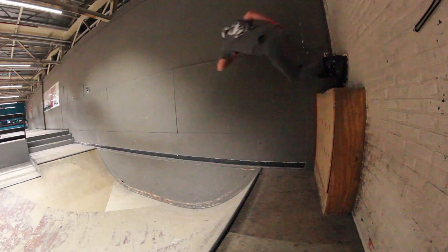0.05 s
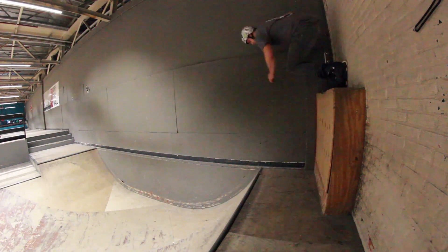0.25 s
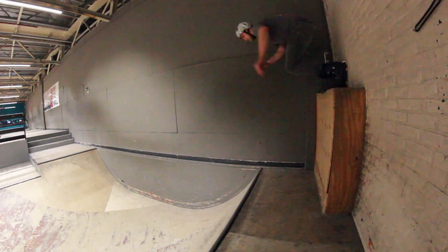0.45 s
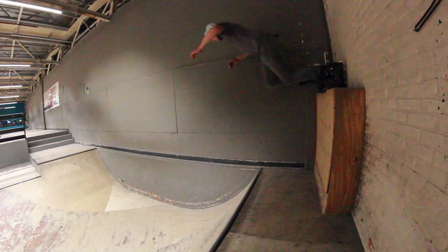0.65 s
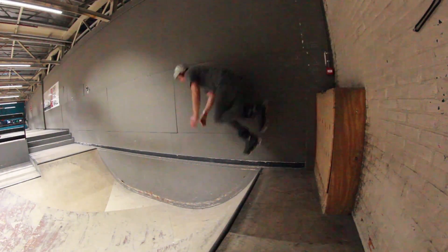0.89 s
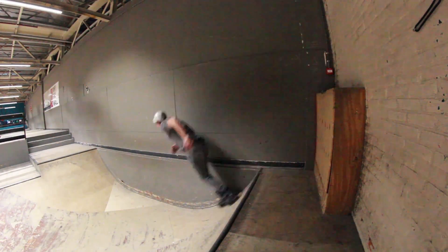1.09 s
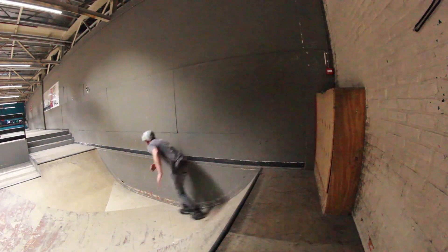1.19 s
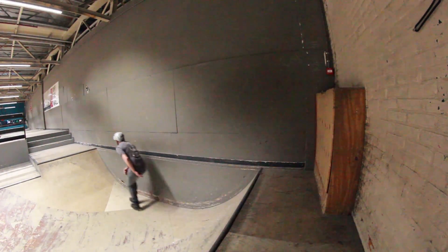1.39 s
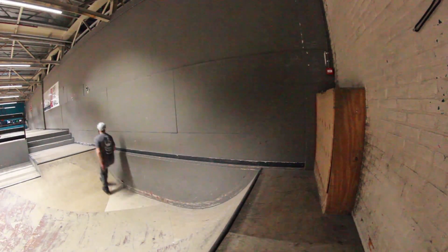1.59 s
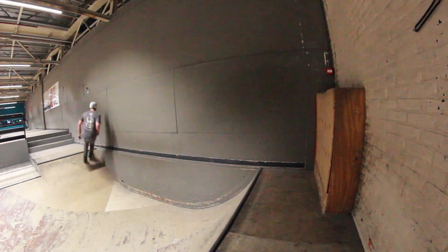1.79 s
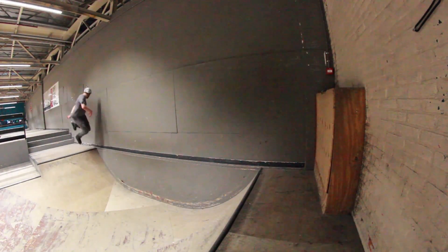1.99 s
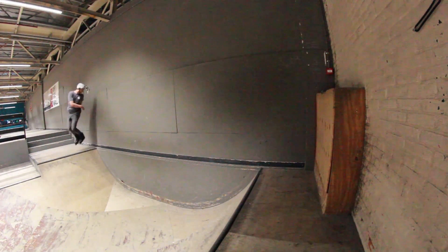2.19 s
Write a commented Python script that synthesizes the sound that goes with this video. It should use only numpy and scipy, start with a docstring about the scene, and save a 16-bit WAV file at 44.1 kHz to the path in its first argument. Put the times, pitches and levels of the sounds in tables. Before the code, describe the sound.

Hard skate knocks on hollow wood, a ramp landing and fading wheel rumble, echoing indoors.

```python
"""Hard wooden thuds and plastic clacks ring out in a large hall, then a rumble rolls away.
An inline skater jumps onto a hollow ledge, stalls, and drops back onto a plywood ramp. Wheels and boots
set the wood ringing and the frames clack; the rolling wheels crunch over grit and knock on panel seams.
The hall rings on behind every blow, and the loudest ones overload the microphone."""
import sys
import numpy as np
from scipy import signal
from scipy.fft import rfft, irfft
from scipy.io import wavfile

SR = 44100
rng = np.random.default_rng(int(sys.argv[2]) if len(sys.argv) > 2 else 0)


def master_out(mix):
    """Clip the mix to full scale and print it as 16-bit PCM to the path in sys.argv[1]."""
    frames = np.transpose(np.atleast_2d(mix))
    ceiling = np.clip(frames, -1, 1)
    pcm = np.round(ceiling * 32767).astype(np.int16)
    wavfile.write(sys.argv[1], SR, pcm)


N = 99225
T = np.arange(N) / SR
HIT_T = T[:SR // 5]  # time axis of one hit
STRIKE_RISE_S = 0.0012

# fader moves of the wheels on wood: t/s, rumble level/dB, gritty roar level/dB
ROLL = [(0, -34, -39), (.1, -43, -43), (.16, -20.5, -20.5), (.24, -25.5, -42), (.33, -26, -57),
        (.5, -33.5, -42.5), (.64, -43.5, -43), (.71, -36.5, -46), (.82, -38, -47), (1.14, -41.5, -55),
        (1.18, -13, -23.5), (1.29, -25.5, -33), (1.4, -25, -28.5), (1.55, -34, -36.5), (1.8, -31.5, -34.5),
        (1.92, -35, -41.5), (2.05, -38.5, -47.5), (2.25, -44, -52.5)]


def amp(db):
    """Decibels to gain."""
    return 10 ** (np.asarray(db) / 20)


def unit(x):
    """Scales to rms 1."""
    return x / np.sqrt(np.mean(x ** 2) + 1e-20)


def read(points, hz):
    """Reads a table on a log-frequency axis."""
    f, value = np.transpose(points)
    return np.interp(np.log(hz + 1), np.log(f + 1), value)


def curve(table, column):
    """One column of a time table at every sample."""
    rows = np.array(table)
    return np.interp(T, rows[:, 0], rows[:, column])


def colour(x, eq):
    """Filters x through an EQ curve."""
    return irfft(rfft(x) * amp(read(eq, np.fft.rfftfreq(len(x), 1 / SR))), len(x))


def noise(eq):
    """Steady coloured noise, rms 1."""
    return unit(colour(rng.standard_normal(N), eq))


def add(mix, s, sound):
    """Mixes a sound in at time s."""
    part = mix[max(round(s * SR), 0):][:len(sound)]
    part += sound[:len(part)]


def wander(hz):
    """Smooth random modulation, rms 1."""
    rolloff = 1 + (np.fft.rfftfreq(N, 1 / SR) / hz) ** 4
    return unit(irfft(rfft(rng.standard_normal(N)) / rolloff, N))


def strike(t, t60, rise=STRIKE_RISE_S):
    """Quick attack, exponential decay."""
    return (1 - np.exp(-t / rise)) * amp(-60 * t / t60)


def ringing(modes, hz, rise, length=1):
    """Struck modes swell as the wheel presses in, then die away; neighbours swing in opposite phase."""
    ring = sum((-1) ** i * amp(db - 60 * HIT_T / (t60 * length)) * np.sin(2 * np.pi * hz * ratio * HIT_T)
               for i, (ratio, db, t60) in enumerate(modes))
    return ring * (1 - np.exp(-HIT_T / rise)) ** 2


def room_tone():
    """A faint, steady bed of air."""
    air_eq = [(20, -24), (100, -25), (300, 1.5), (1000, -10.5), (3000, -14), (7000, -25.5), (16000, -29)]  # f/Hz, level/dB
    return amp(-53.5) * noise(air_eq)


def hall(x):
    """Scatter off the surrounding ramps, then the long tail of the hall."""
    decay = [(60, 1.2), (250, 0.86), (500, 2.4), (1200, 1.15), (2500, 1.42), (5000, 1.0), (8000, 0.67),
             (11000, -0.1), (15000, -0.5)]  # ring time, floored below: f/Hz, t60/s
    tail_eq = [(60, -4.5), (250, -8.5), (380, -10.5), (550, -8), (1200, -5.5), (2500, -4.5), (5000, -3.5),
               (8000, -6), (14000, -5)]  # f/Hz, level/dB
    hz, t, bands = signal.stft(rng.standard_normal(N), SR, nperseg=512)
    t60 = np.maximum(read(decay, hz), 0.05)[:, None]
    equal_energy = np.sqrt(2 * np.log(1000) / (t60 * SR))
    bands = bands * amp(read(tail_eq, hz)[:, None] - 60 * t / t60) * equal_energy
    tail = signal.istft(bands, SR, nperseg=512)[1][:N]
    tail *= 1 - np.exp(-T / 0.015)  # the tail blooms
    taps = rng.standard_normal(N) * (rng.random(N) < 1500 / SR) * strike(T, t60=0.16, rise=0.012)
    scatter = amp(-12) * taps / np.linalg.norm(taps)
    return signal.fftconvolve(x, scatter + tail)[:N]


def reflected(x):
    """The direct sound with its early reflections off wall and ramp."""
    echoes = [(.0052, -17), (0.0103, -12.5), (0.022, -15.5)]  # delay/s, level/dB
    out = x.copy()
    for delay, db in echoes:
        add(out, delay, amp(db) * x)
    return out


def boom():
    """A narrow resonance of the hollow woodwork that shifts as the skater moves over it."""
    glide = [(0, 256, -42), (.22, 270.5, -58), (.3, 276.6, -20), (.45, 262, -28), (.6, 249.4, -33),
             (.7, 242.6, -39.5), (.87, 280, -38.5), (1.13, 255, -46), (1.2, 330.7, -26),
             (1.28, 330.3, -22.5), (1.42, 310.7, -42), (1.52, 318, -29.5), (1.62, 290, -30),
             (1.72, 252, -30.5), (1.79, 232.2, -28.5), (1.85, 215, -70), (2.25, 270, -47)]  # panel resonance: t/s, f/Hz, level/dB
    width_hz = 60
    shake = wander(width_hz / 2) + 1j * wander(width_hz / 2)
    shake /= np.sqrt(abs(shake) + 0.3)  # evens out the swells
    carrier = np.exp(2j * np.pi * np.cumsum(curve(glide, column=1)) / SR)
    return amp(curve(glide, column=2)) * unit((shake * carrier).real)


def specks():
    """Tiny snaps of dirt crushed by the wheels, riding below the roar."""
    speck_eq = [(1000, -20), (4000, 0), (8000, 0), (13000, -5), (16000, 1)]  # f/Hz, level/dB
    per_s, under_roar_db = 210, 23
    hits = (rng.random(N) < per_s / SR) * rng.random(N) ** 2
    snaps = signal.fftconvolve(hits, strike(T[:SR // 20], t60=0.022, rise=0.00018))[:N]
    return amp(curve(ROLL, column=2) - under_roar_db) * unit(snaps * noise(speck_eq))


def rolling():
    """Wheels shake the ramp and crunch over fine grit under a fluttering load."""
    rumble_eq = [(20, -53), (45, -24.5), (100, -6.5), (180, -0.5), (300, 2), (450, -5), (700, -10.5),
                 (1500, -16), (4000, -47)]  # f/Hz, level/dB
    roar_eq = [(100, -4.5), (400, 0.5), (800, 1.5), (1500, -8), (2500, -10.5), (4000, -17.5), (7000, -30.5),
               (11000, -35), (16000, -42.5)]  # f/Hz, level/dB
    grains_per_s, spread_db, flutter_db = 6000, 2.0, 1.5
    grit = rng.standard_normal(N) * (rng.random(N) < grains_per_s / SR)
    grit *= amp(spread_db * np.minimum(rng.exponential(1, N), 3))
    load = unit(amp(flutter_db * wander(hz=33)))
    rumble = amp(curve(ROLL, column=1)) * noise(rumble_eq)
    roar = amp(curve(ROLL, column=2)) * unit(colour(grit, roar_eq))
    return load * (rumble + roar)


def slides():
    """Brief swells of friction: a wheel scuffs sideways, a boot rubs along the ledge."""
    scuffs = [(1.951, .016, -35.5)]  # t/s, length/s, level/dB
    scuff_eq = [(300, -14), (1300, 7.5), (2500, -1.5), (5000, -3.5), (10000, -9.5), (16000, -15)]  # f/Hz, level/dB
    rubs = [(.668, 0.068, -34)]  # t/s, length/s, level/dB
    rub_eq = [(100, -31), (380, 0), (600, 9), (780, -11), (1100, -15), (3000, -26), (16000, -49)]  # f/Hz, level/dB
    friction = np.zeros(N)
    for cues, eq in (scuffs, scuff_eq), (rubs, rub_eq):
        swell = np.zeros(N)
        for s, length, db in cues:
            add(swell, s, amp(db) * np.sqrt(np.hanning(int(length * SR))))
        friction += swell * noise(eq)
    return friction


def seams():
    """Wheels knock and click over panel seams. Gives the ring and the click's (envelope, EQ)."""
    cues = [(1.3703, -4.5, -23, 500), (1.401, -19, -33, 702), (1.645, -17, -39, 1023),
            (1.678, -18.5, -29, 916), (1.7486, -22, -20, 960), (1.788, -35, -23, 1273)]  # t/s, knock level/dB, click level/dB, knock f/Hz
    wheel_modes = [(.78, -6, 0.013), (1.03, 3, 0.014), (1.6, -4, 0.026), (1.76, -8.5, 0.023),
                   (2.65, -5, 0.011), (3.15, -15.5, .025), (5.4, -20, 0.028)]  # pitch ratio, level/dB, t60/s
    click_eq = [(400, 7.5), (1500, 8), (2500, 4), (4000, -6.5), (7500, -12.5), (10000, -19), (16000, -40)]  # f/Hz, level/dB
    ring, click = np.zeros((2, N))
    for s, knock_db, click_db, hz in cues:
        add(ring, s, amp(knock_db) * ringing(wheel_modes, hz, rise=0.00082))
        add(click, s, amp(click_db) * strike(HIT_T, t60=0.034))
    return ring, (click, click_eq)


def cracks():
    """The hard, bright snap of a frame against an edge, as (envelope, EQ)."""
    cues = [(0.1512, -3.5), (0.2588, -19.5), (1.1637, -34), (1.748, -28)]  # t/s, level/dB
    crack_eq = [(200, -12), (800, 7), (1400, 3.5), (2000, 0), (2900, -11), (3600, 1), (4500, 3), (5300, 1),
                (6000, 4.5), (6700, 2.5), (7500, -3.5), (11000, -14), (16000, -11)]  # f/Hz, level/dB
    snap = np.zeros(N)
    for s, db in cues:
        add(snap, s, amp(db) * strike(HIT_T, t60=0.013))
    return snap, crack_eq


def blows():
    """Skates slam the plywood and rattle. Gives the thud, then clack and tick as (envelope, EQ)."""
    # t/s, thud level/dB, frame clack level/dB, sharp tick level/dB, wood f/Hz, ring length factor
    cues = [(0.1179, -1.5, -14, -21.5, 385, 0.48), (0.138, -2.5, -15.5, -32, 298, 0.38),
            (0.151, -5.5, -16, -25, 214, 0.4), (0.1616, -19, -32, -26, 273, .7),
            (.172, -21, -27, -20.5, 326, 0.49), (.249, -24, -17.5, -33, 620, 0.47),
            (.2575, -1, -10, -29.5, 295, 0.95), (0.2637, 1, -40, -27, 313, 0.83),
            (0.2783, -2, -15.5, -33.5, 311, 0.44), (0.305, -32, -20, -44, 295, 0.5),
            (.342, -15, -29, -56, 304, 0.77), (1.1491, -12, -26, -39, 350.8, 0.21),
            (1.1636, -1.5, -10.5, -22, 352, 0.61), (1.1715, -0.5, -16, -36, 367, 0.36),
            (1.1857, -5.5, -22, -24.5, 328, 0.94), (1.2117, -44, -24, -40, 325, 0.66),
            (1.245, -15.5, -33, -48, 300, 1), (1.4916, -16, -36, -63, 294, 0.6),
            (1.586, -17.5, -31.5, -41.5, 247, 1)]
    plywood_modes = [(0.358, -18, 0.17), (0.562, -16, 0.093), (0.819, -6.5, 0.12), (1.029, -3, 0.038),
                     (1.388, -3, 0.077), (1.72, -7, 0.054), (2.1, -9.5, 0.038)]  # pitch ratio, level/dB, t60/s
    clack_eq = [(60, -59), (300, -8), (560, 5.5), (800, 2), (1400, -3.5), (2200, -5.5), (3200, -14.5),
                (6000, -31), (16000, -41)]  # f/Hz, level/dB
    tick_eq = [(500, -20), (2500, -5), (4500, -2), (5300, 1), (6400, 0), (8000, -4), (11500, -6),
               (13500, -10), (16000, -15)]  # f/Hz, level/dB
    thud, clack, tick = np.zeros((3, N))
    for s, thud_db, clack_db, tick_db, hz, length in cues:
        add(thud, s, amp(thud_db) * ringing(plywood_modes, hz, rise=0.0013, length=length))
        add(clack, s, amp(clack_db) * strike(HIT_T, t60=0.04))
        add(tick, s, amp(tick_db) * strike(HIT_T, t60=0.026))
    return thud, (clack, clack_eq), (tick, tick_eq)


def scene():
    """The skater up close; the hall answers from three directions, each with its own grain."""
    wheel_send_db, crack_send_db = -4.5, -1.5
    thud, clack, tick = blows()
    knock, click = seams()
    snap, crack_eq = cracks()
    wheels = rolling() + specks()
    body = thud + knock + slides()
    direct, *outward = [body + sum(envelope * noise(eq) for envelope, eq in (clack, tick, click))
                        for _ in range(4)]
    reverb = sum(hall(x + amp(wheel_send_db) * wheels + amp(crack_send_db) * snap * noise(crack_eq))
                 for x in outward) / np.sqrt(len(outward))
    close = reflected(direct + snap * noise(crack_eq))
    return (close + wheels + boom() + reverb + room_tone())[None]


def record(dry):
    """The loudest peaks clip at the microphone; a steep low-pass trims the top."""
    lowpass = signal.firwin(511, cutoff=16100, window=("kaiser", 9), fs=SR)
    return signal.oaconvolve(np.clip(dry, -1, 1), lowpass[None], "same")


dry = scene()
out = record(dry)
master_out(out)
```